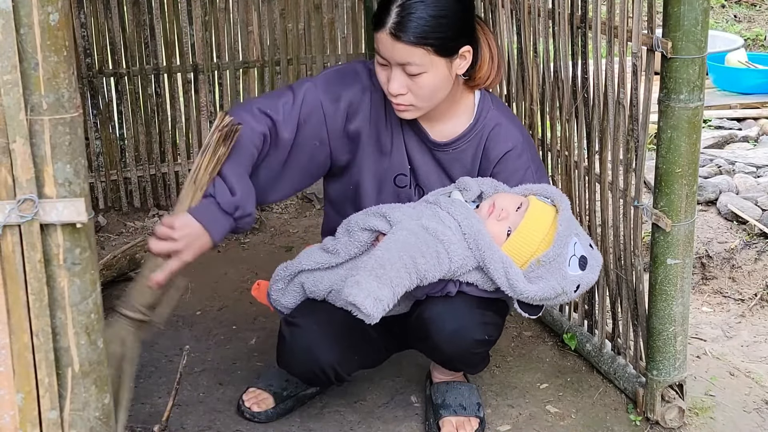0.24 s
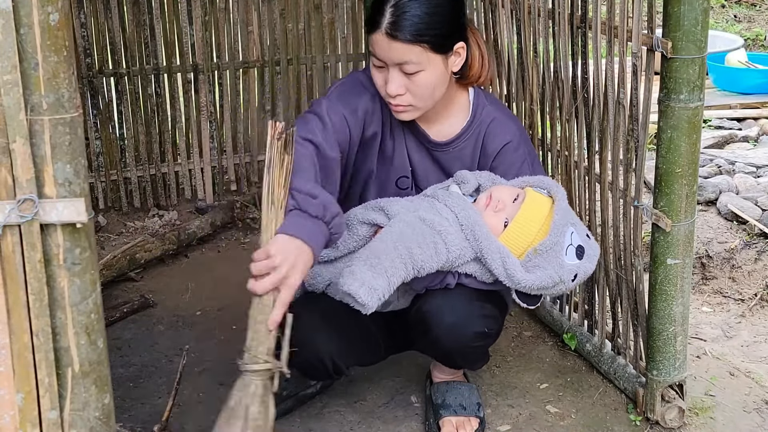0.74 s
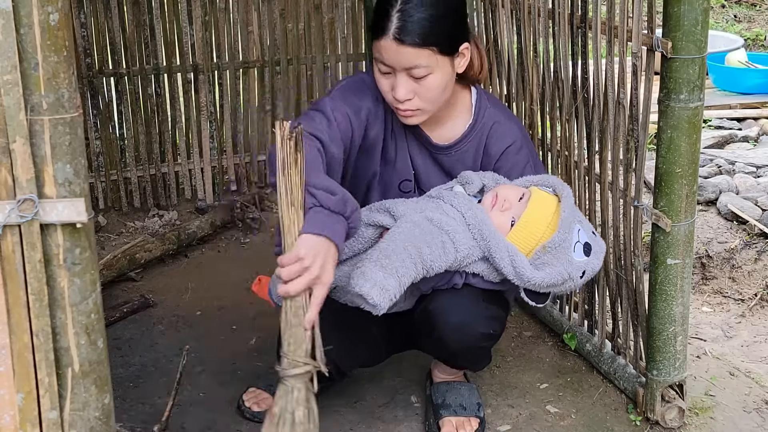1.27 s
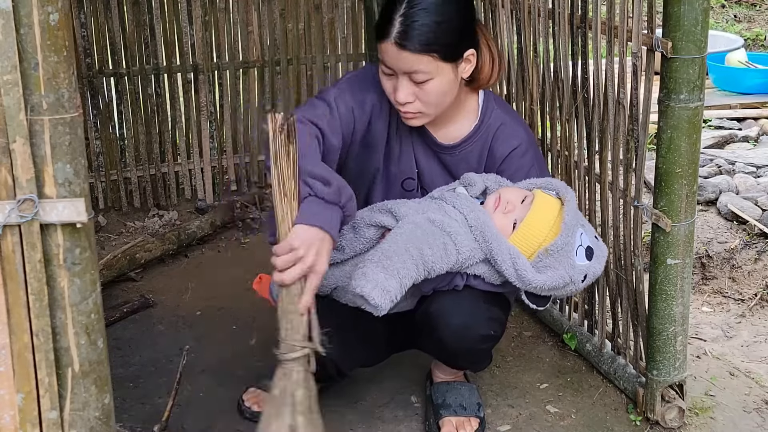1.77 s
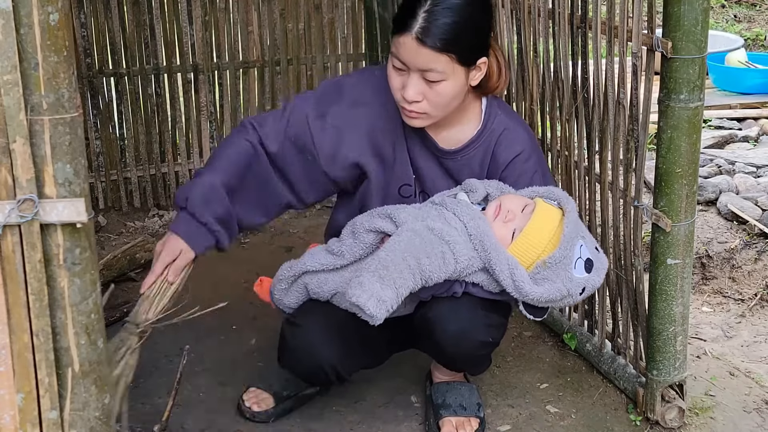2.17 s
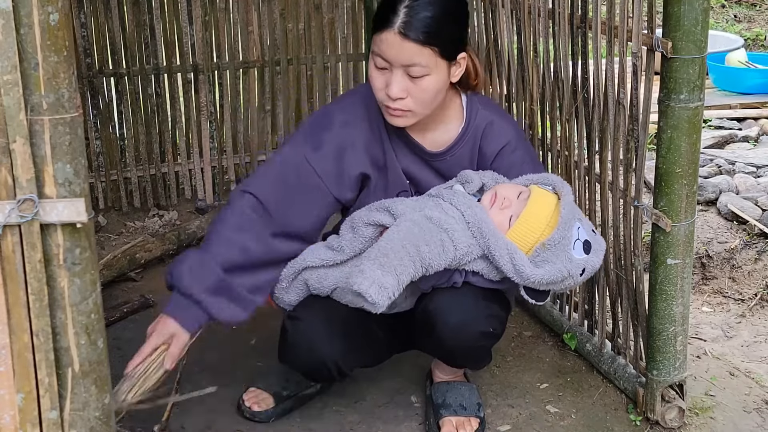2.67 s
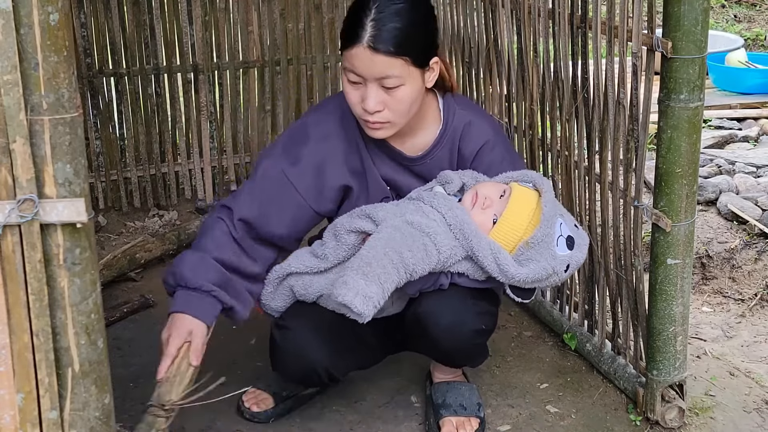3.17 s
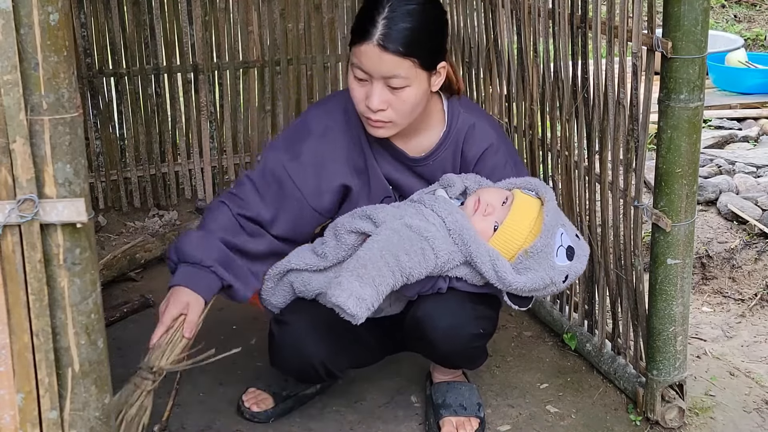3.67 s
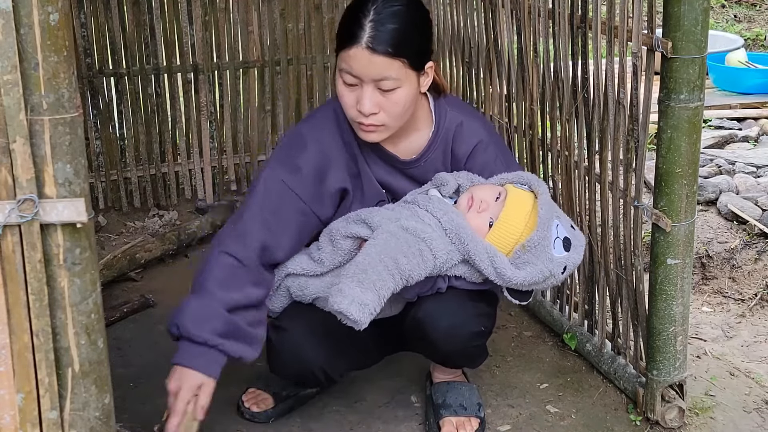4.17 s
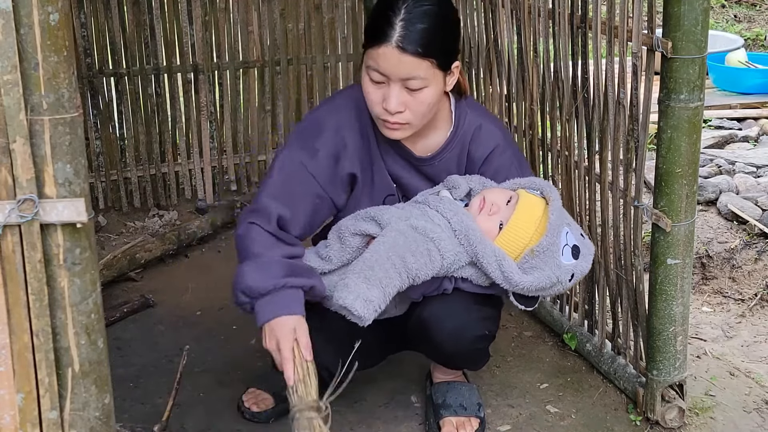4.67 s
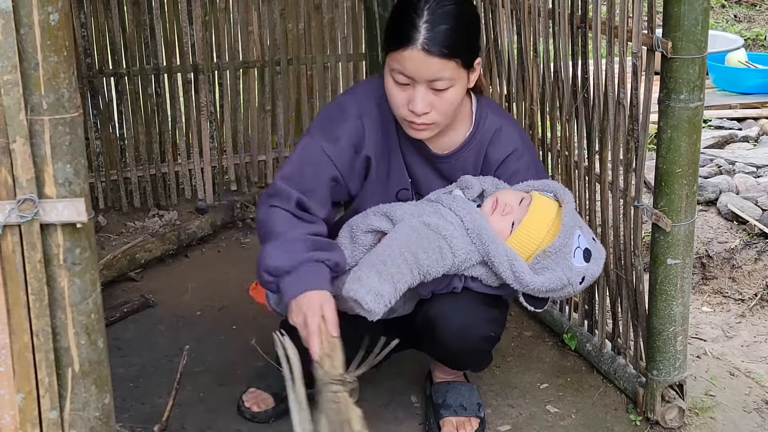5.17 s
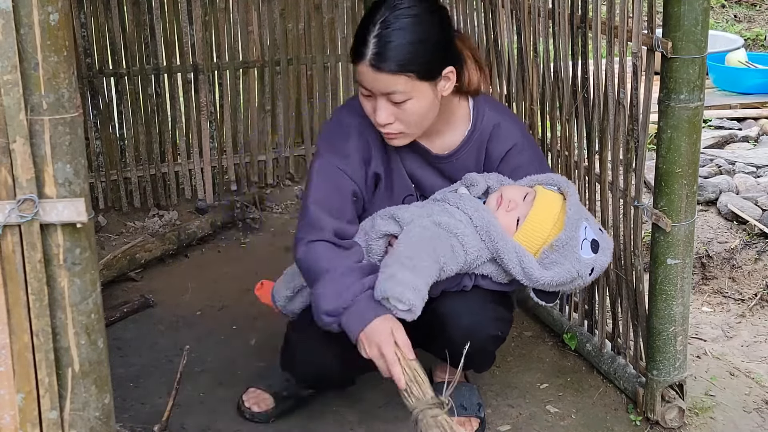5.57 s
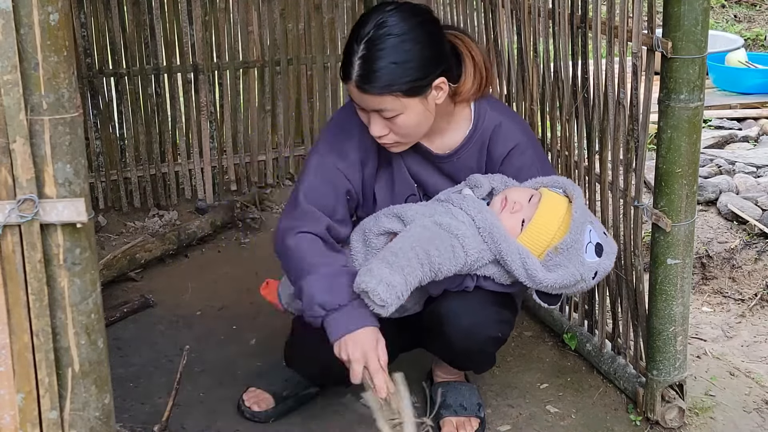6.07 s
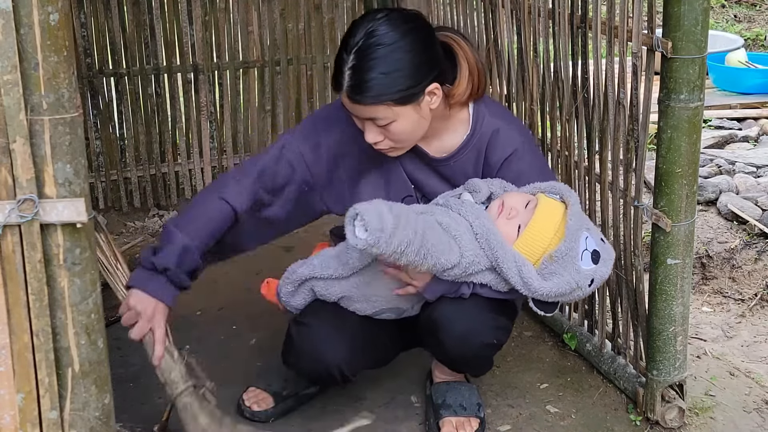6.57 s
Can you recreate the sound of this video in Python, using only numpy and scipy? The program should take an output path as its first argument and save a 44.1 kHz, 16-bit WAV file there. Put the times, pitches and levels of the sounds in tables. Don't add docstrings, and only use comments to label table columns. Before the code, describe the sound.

Close, crisp sweeping of brittle stalks over gritty earth, with small snaps and a brief hollow bamboo clatter, while a low engine drones far off.

```python
import sys
import numpy as np
from scipy import signal
from scipy.fft import rfft, irfft, next_fast_len
from scipy.io import wavfile

SR = 44100
rng = np.random.default_rng(int(sys.argv[2]) if len(sys.argv) > 2 else 0)


def put_to_file(sound):
    columns = np.atleast_2d(sound).T
    safe = np.clip(columns, -1, 1)
    whole_steps = np.round(safe * 32767)
    wavfile.write(sys.argv[1], SR, whole_steps.astype(np.int16))


def field_ratio(decibels):
    return 10 ** (np.asarray(decibels, dtype=float) / 20)


N = 301188


def rms_one(x):
    return x / np.sqrt(np.mean(x ** 2) + 1e-20)


def in_time(rows):
    s, *columns = np.transpose(rows)
    return [np.interp(np.arange(N) / SR, s, column) for column in columns]


def at_hz(points, hz):
    points_hz, values = np.transpose(points)
    return np.interp(np.log(hz), np.log(points_hz), values)


def drift(rate_hz):
    r = np.exp(-80 * np.pi * rate_hz / SR)
    noise = rng.standard_normal(N // 40 + 2002)
    slow = signal.lfilter([1], [1, -2 * r, r * r], noise)[2000:]
    return np.interp(np.arange(N) / 40, np.arange(len(slow)), rms_one(slow))


def ring(clicks, hz, t60_s):
    r, w = field_ratio(-60 / (t60_s * SR)), 2 * np.pi * hz / SR
    return signal.lfilter([0, np.sin(w)], [1, -2 * r * np.cos(w), r * r], clicks + 1e-18)


def slips(per_s, spread_db, shape):
    size_db = spread_db * np.minimum(rng.exponential(1, shape), 5)
    sizes = field_ratio(size_db) * rng.choice([-1, 1], shape)
    return rms_one(sizes * (rng.random(shape) < per_s / SR))


def bands(source, spectrum, likeness, patchy_db, tilt_db=lambda hz: 0):
    out, power = 0, 0
    edges = 33 * 2 ** np.arange(0, 9.6, .5)
    edges = edges[edges > .7 * spectrum[0][0]]
    for k, (low, high) in enumerate(zip(edges, edges[1:])):
        band = signal.butter(2, [low, min(high, .45 * SR)], "band", fs=SR, output="sos")
        mid, side = signal.sosfilt(band, source[k % 2])
        hz = np.sqrt(low * high)
        alike = np.clip(at_hz(likeness, hz), -1, 1)
        pair = np.sqrt(1 + alike) * mid + np.sqrt(1 - alike) * side * [[1], [-1]]
        level_db = at_hz(spectrum, hz)
        power += np.mean(pair ** 2) * field_ratio(2 * level_db)
        out = out + field_ratio(level_db + patchy_db * drift(16.3) + tilt_db(hz)) * pair
    return out / np.sqrt(power)


def contacts(rows):
    approach_db, approach_db_per_s, land_db_per_s = -16.5, 202, 2000
    lift_db_per_s, roll_db, roll_db_per_s = 300, -28.5, 44
    tips_at_lift_db, tips_fade = -1.5, 0.68
    earth_at_landing_db, earth_at_lift_db = -6.5, -10
    t = np.arange(N // 32 + 2) * 32 / SR
    lands, down, land_db, lift_db, tips_db = np.transpose(rows)[:, :, None]
    done = np.clip((t - lands) / np.maximum(down, .002), 0, 1)
    early, late = np.maximum(lands - t, 0), np.maximum(t - lands - down, 0)
    pressed = 1 - (1 - done) ** 2.21
    power = field_ratio(2 * (land_db + (lift_db - land_db) * pressed))
    graze = (early > 0) * field_ratio(2 * (approach_db - approach_db_per_s * early))
    power = power * (field_ratio(-2 * land_db_per_s * early) + graze)
    roll = field_ratio(2 * (roll_db - roll_db_per_s * late))
    power = power * (field_ratio(-2 * lift_db_per_s * late) + roll) + 1e-14
    total = power.sum(axis=0)
    tips = tips_db + (tips_at_lift_db - tips_fade * tips_db) * done
    earth = earth_at_landing_db + (earth_at_lift_db - earth_at_landing_db) * done
    earth = earth + 1 * np.sin(np.pi * done)
    tips, earth = [(power * share_db).sum(axis=0) / total for share_db in (tips, earth)]
    return [np.interp(np.arange(N) / SR, t, curve) for curve in (10 * np.log10(total), tips, earth)]


def stalk_rings(per_s):
    clicks, dealt = slips(per_s, 1.25, (2, N)), rng.integers(0, 18, (2, N))
    pitches_hz = np.geomspace(1000, 13000, num=18) * rng.uniform(0.85, 1.05, 18)
    return rms_one(sum(np.sqrt(hz) * ring(clicks * (dealt == k), hz, 70 / hz)
                       for k, hz in enumerate(pitches_hz)))


def broom():
    # lands_s, down_s, landing_db, lift_off_db, landing_tip_hiss_db
    strokes = [(0.0, 0.052, -57, -51.5, 4.5), (.357, 0.16, -48.5, -54.5, 4), (.76, 0.21, -54, -45, 2.5),
               (1.238, 0.18, -58, -51.5, 5.5), (1.45, 0.11, -57, -48, 2), (1.832, 0.14, -50.5, -44, 2),
               (2.373, 0.17, -56.5, -45.5, 2), (2.76, 0.21, -68, -46.5, 3), (3.26, 0.17, -65, -56, 2),
               (3.406, 0.024, -41, -40.5, -3.5), (3.878, 0.17, -50.5, -46.5, -2.5),
               (4.13, 0.3, -60.5, -48, 5.5), (4.45, 0.31, -72.5, -42.5, 3), (4.887, .27, -55.5, -43.5, 5.5),
               (5.43, 0.17, -65.5, -42, 2), (6.016, 0.18, -47.5, -40.5, 2.5), (6.58, 0.14, -64.5, -38.5, 3),
               (6.74, 0.074, -45.5, -44, 3.5)]
    touches = [(.3, 0.069, -92, -61, 0), (0.453, 0.021, -45.5, -48.5, -6.5), (0.949, 0.031, -47.5, -49, 14),
               (2.013, .022, -49.5, -48, 10.5), (3.17, 0.043, -72, -66.5, 3), (3.84, .03, -91, -74, -10),
               (4.08, 0.085, -62.5, -65, 17), (4.44, .08, -69, -58.5, 15), (4.71, 0.02, -47, -49.5, 3),
               (4.86, 0.009, -68, -63, 14), (.62, 0.15, -72, -70, 3.5), (1.113, .012, -60.5, -59.5, 7.5),
               (1.18, .045, -73, -69.5, -2), (1.7, 0.076, -71.5, -70, -1), (2.3, .05, -69, -68, 1),
               (2.64, 0.06, -61, -68.5, 1), (3.019, 0.12, -60, -59.5, 5), (4.96, .012, -63, -64, 20),
               (5.194, 0.011, -52, -52.5, 7), (5.372, 0.016, -82, -56, 13), (5.638, 0.026, -55, -53.5, 9),
               (5.95, 0.053, -65, -57.5, 0.5), (6.28, .09, -70, -71.5, -3)]
    # hz, level_db per Hz
    scratch = [(200, -29), (300, -11.5), (430, -48), (650, -10), (1000, -15), (1600, -5), (2600, -1),
               (3800, -0.5), (5500, -2.5), (7500, -3.5), (10500, -4), (13000, -10), (15500, -6)]
    # hz, likeness (0-1)
    likeness = [(200, .95), (700, .86), (1700, .72), (2500, .62), (3600, .36), (5000, .05), (7000, 0),
                (12000, 0)]
    # time_s, dip_hz, dip_db
    echo_dip = [(0, 5500, 0.5), (2.2, 4940, 0.5), (2.7, 4730, -3), (3.5, 3300, -0.5), (3.9, 3350, -6.5),
                (4.3, 3730, -4.5), (4.6, 4400, -6), (5.2, 4970, -4), (6.83, 5170, -3)]
    scratch_db, tips_db, earth_db = contacts(strokes + touches)
    dip_hz, dip_db = in_time(echo_dip)
    pan_db = np.interp(np.arange(N) / SR, [4.0, 4.7], [-.5, -1.4])
    grit = slips(3000, 1.65, (2, 2, N)) + 1.06 * rng.standard_normal((2, 2, N))
    grit = grit + 0.53 * stalk_rings(600)

    def tilt_db(hz):
        tip_share = np.clip(np.log2(hz / 4000) / 1.1, 0, 1)
        earth_share = np.clip(np.log2(1900 / hz) / 1.0, 0, 1)
        dip = dip_db * np.exp(-(np.log2(hz / dip_hz) / 0.47) ** 2)
        return tip_share * (tips_db + 0.27) + earth_share * (earth_db + 11) + dip

    bunching_db = 1.1 * drift(55)
    gain = field_ratio(scratch_db + 7.0 + bunching_db + pan_db * [[.5], [-.5]])
    return gain * bands(grit, scratch, likeness, 1.49, tilt_db)


def flicks():
    # start_s, peak_db, pitch_hz, t60_s
    snaps = [(0.3536, -47, 2000, 0.13), (1.1152, -35, 3900, 0.042), (1.8466, -43, 2290, 0.027),
             (2.0294, -38.5, 3720, 0.058), (2.153, -46, 9970, 0.033), (2.3007, -70, 2220, 0.03),
             (4.727, -35, 2850, 0.038), (5.3742, -45.5, 2520, 0.03), (5.7494, -70, 3676, 0.029),
             (5.7965, -42, 9200, 0.023), (5.8344, -68, 2630, 0.03), (6.3125, -39.5, 9500, 0.029),
             (6.356, -47.5, 2793, 0.026), (6.378, -63, 3480, 0.032), (6.4407, -49, 8760, 0.046),
             (6.4532, -48.5, 11700, 0.07), (6.4996, -68, 2144, 0.029)]
    out, t = np.zeros((2, N)), np.arange(SR // 10) / SR
    for s, peak_db, hz, t60_s in snaps:
        burst = slips(5500, 1.9, (2, len(t))) * field_ratio(-60 * t / max(t60_s, .005))
        snap = ring(burst, hz, 11 / hz) + 0.91 * np.diff(burst, prepend=0)
        at = round(s * SR)
        out[:, at:at + len(t)] += field_ratio(peak_db - 12.0) * snap
    return out


def offcut():
    # start_s, peak_db, then hollow_db, edge_db, fibres_db re peak
    knocks = [(2.964, -47, 0.5, -13, -15), (3.002, -39.5, -11, -2.5, -3.5), (3.098, -41.5, -8, -3.5, -17),
              (3.32, -49, -3, -4, -11), (3.356, -49, 3, 5, -15), (3.406, -40.5, -2, 10.5, -1),
              (3.427, -26.5, -4, 0, 0), (3.452, -27.5, -12, -8, -4), (3.503, -25, 2, -5, -7.5),
              (3.567, -26.5, -23, -1.5, 2), (3.605, -18.5, -2, -10.5, -3), (3.731, -59, 6, -50, -7),
              (3.786, -60, 4, -4, -21), (3.888, -56, -5, -4, -14), (4.024, -37, -13, 8.5, -17),
              (4.361, -33, -10.5, 2, -1.5), (4.394, -39.5, -3.5, -6, -3), (4.888, -47, 0, -14, 0)]
    # start_s, lasts_s, level_db
    drags = [
        (2.925, 0.042, -51.5),
        (3.105, 0.018, -56.5),
        (3.312, 0.083, -56.5),
        (4.152, 0.043, -61.5),
        (4.668, 0.038, -55.5),
        (3.425, 0.042, -57),
        (4.039, 0.013, -52),
        (4.307, 0.098, -51),
        (4.885, 0.024, -62.5),
    ]
    # hz, level_db, t60_s
    hollow = [(568, -20, 0.051), (758.4, -2.5, 0.083), (843, -3, 0.055), (1062, -1.5, 0.022)]
    edge = [(950, -4, 0.045), (1340, -3, 0.045), (1604, -10, 0.035)]
    fibres = [(1750, -9, .04), (2110, -5, .04), (2460, -10, .035), (3010, -7, .04), (3300, -11, .03),
              (3670, -6, .05), (4420, -11, .03), (5000, -12, .025), (5490, -13, .025)]
    rise_db_per_s, fall_db_per_s = 788, 800
    swell_t60_s = 0.0055
    s, peak_db, *shares_db = np.transpose(knocks)
    at = np.round(s * SR).astype(int)
    t = np.arange(N) / SR
    drag_db = np.max([db - rise_db_per_s * np.maximum(start - t, 0)
                      - fall_db_per_s * np.maximum(t - start - lasts, 0)
                      for start, lasts, db in drags], axis=0)
    rattle = field_ratio(drag_db - 17.5) * slips(540, 4.0, N)
    scatter_db = rng.normal(0, 1, (len(at), 16)) * np.geomspace(1.5, 4, 16)
    wood, k = np.zeros(N), 0
    swell = 2 * (1 - field_ratio(-60 / (swell_t60_s * SR)))
    for modes, share_db, rattle_db in zip([hollow, edge, fibres], shares_db, [-9, -1.0, -5]):
        for hz, level_db, t60_s in modes:
            clicks = rattle * field_ratio(rattle_db)
            clicks[at + rng.integers(0, 50)] += field_ratio(peak_db + share_db + scatter_db[:, k])
            mode = ring(ring(clicks, hz, swell_t60_s), hz, t60_s)
            wood += (-1) ** k * field_ratio(level_db + 0.5) * swell * mode
            k += 1
    hits = np.zeros(N)
    hits[at] = field_ratio(peak_db + shares_db[2] - 8.5)
    crack = sum(gain * signal.lfilter([1], [1, -field_ratio(-60 / (t60_s * SR))], hits)
                for gain, t60_s in [(0.62, 0.03), (0.83, 0.13)])
    upper = signal.butter(4, [1200, 6200], "band", fs=SR, output="sos")
    no_bass = signal.butter(4, 600, "high", fs=SR, output="sos")
    return signal.sosfilt(no_bass, wood), signal.sosfilt(upper, crack * rng.standard_normal((2, N)))


def bumps():
    # start_s, note_db, thud_db
    soft_hits = [(2.9, -50, -70), (3.102, -48.5, -53), (3.412, -45, -54), (3.427, -46, -50),
                 (3.503, -55, -55), (3.606, -66, -48.5), (3.731, -53, -72), (3.786, -66, -70),
                 (3.887, -50, -60), (4.025, -52, -47.5), (4.175, -63, -53), (4.348, -62, -45),
                 (4.892, -56, -55)]
    s, note_db, thud_db = np.transpose(soft_hits)
    at = np.round(s * SR).astype(int)
    note, thud = np.zeros(N), np.zeros(N)
    note[at], thud[at] = field_ratio(note_db), field_ratio(thud_db)
    soft = signal.butter(2, 900, fs=SR, output="sos")
    return signal.sosfilt(soft, ring(note, 540, 0.059) + ring(thud, 299, 0.05))


def hut(x):
    t60_s, wall_cut_hz = 0.09, 9000
    size = next_fast_len(N + SR // 2)
    w = 2 * np.pi * np.arange(size // 2 + 1) / size
    dull = np.exp(-2 * np.pi * wall_cut_hz / SR)
    wall = (1 - dull) / (1 - dull * np.exp(-1j * w))
    response = np.zeros((2, len(w)), complex)
    lags = (rng.uniform(0.0079, .022, 12) * SR).astype(int)
    for k, lag in enumerate(lags):
        loop = field_ratio(-60 * lag / SR / t60_s) * wall * np.exp(-1j * w * lag)
        response[k % 2] += (-1) ** (k // 2) * loop / (1 - loop)
    return irfft(rfft(x, size) * response, size)[:, :N]


def engine():
    # time_s, firing_hz, level_db, load (0-1)
    running = [(0, 52.2, -57, 0.4), (.25, 51.78, -59.5, 0.34), (1.14, 59.43, -59, 0.17),
               (1.4, 61.8, -65, 0), (2.0, 65.35, -61.5, .6), (2.6, 66.6, -59.5, 0.56),
               (3.5, 68.5, -60, 0.42), (4.3, 64.16, -60, 0.75), (4.8, 64.23, -59.5, 0.12),
               (6.1, 62.22, -58.5, .45), (6.4, 62.45, -66, 0), (6.83, 61.5, -57, 0.3)]
    orders_db = [-10, 0.9, -5.5]
    orders_load_db = [16.5, -0.5, -45.5]
    hz, level_db, load = in_time(running)
    phase = 2 * np.pi * np.cumsum(hz * (1 + .003 * drift(6))) / SR
    out = np.zeros(N)
    for k, (db, more_db) in enumerate(zip(orders_db, orders_load_db)):
        order_db = level_db + db + load ** (1 + k / 2) * more_db + 0.27 * drift(29)
        out += np.sqrt(2) * field_ratio(order_db) * np.sin((k + 1) * phase + k)
    return out


def outdoor_air():
    # hz, level_db per Hz
    spectrum = [(15, -37), (25, -18), (119, -3.5), (215, -28), (246, 11), (322, -26), (495, -34.5),
                (648, -27), (919, -34), (4500, -36), (5880, -41), (8810, -48), (9550, -38), (11800, -51),
                (15500, -57)]
    # hz, likeness (0-1)
    likeness = [(100, .985), (300, .9), (700, .3), (1500, 0), (12000, 0)]
    return field_ratio(-59) * bands(rng.standard_normal((2, 2, N)), spectrum, likeness, 2.4)


def scene():
    wood, crack = offcut()
    spot = wood * field_ratio([[-.4], [.4]]) + field_ratio(-13) * hut(wood) + crack + bumps()
    left, right = spot + outdoor_air() + engine() * field_ratio([[.2], [-.2]])
    return broom() + flicks() + np.array([left, np.roll(right, 2)])


def band_limit(x):
    return signal.sosfilt(signal.butter(12, 16680, fs=SR, output="sos"), x)


def record(dry):
    # centre_hz, width_hz, depth (0-1)
    mic_dip = (5920, 250, 0.59)
    ports = np.array([dry[0], np.roll(dry[1], 2)])
    x = signal.sosfilt(signal.butter(2, 45, "high", fs=SR, output="sos"), ports)
    hz, width_hz, depth = mic_dip
    x = x - depth * signal.lfilter(*signal.iirpeak(hz, hz / width_hz, SR), x)
    x = signal.sosfilt(signal.ellip(14, .3, 75, 15650, fs=SR, output="sos"), x)
    return band_limit(x)


dry = scene()
out = record(dry)
put_to_file(out)
```